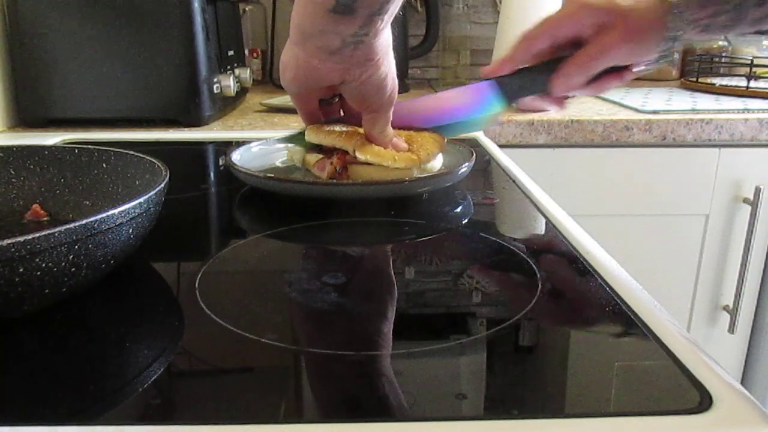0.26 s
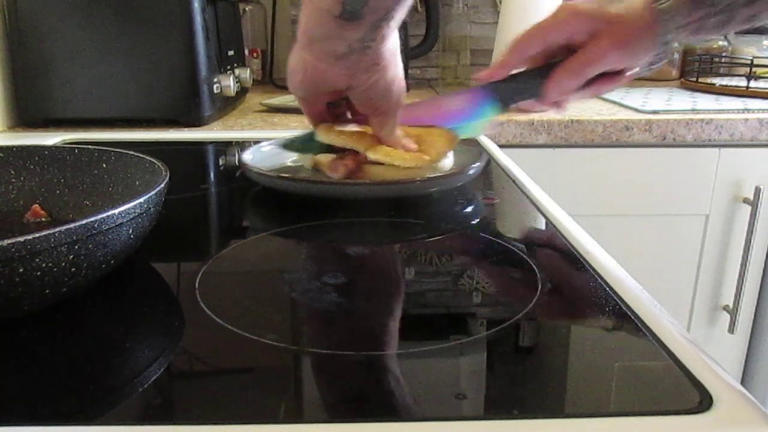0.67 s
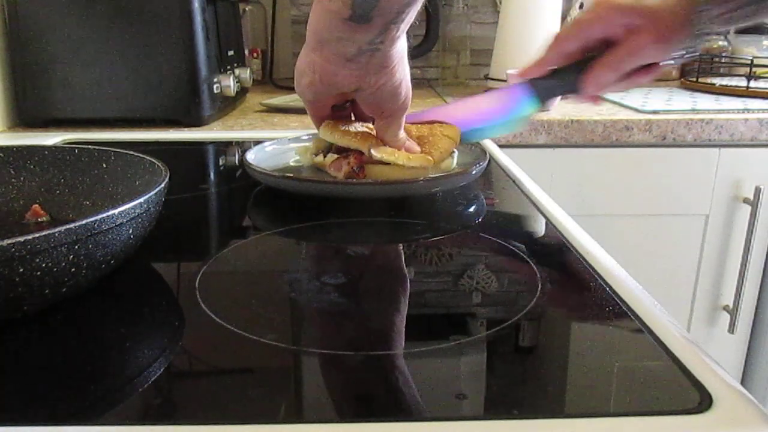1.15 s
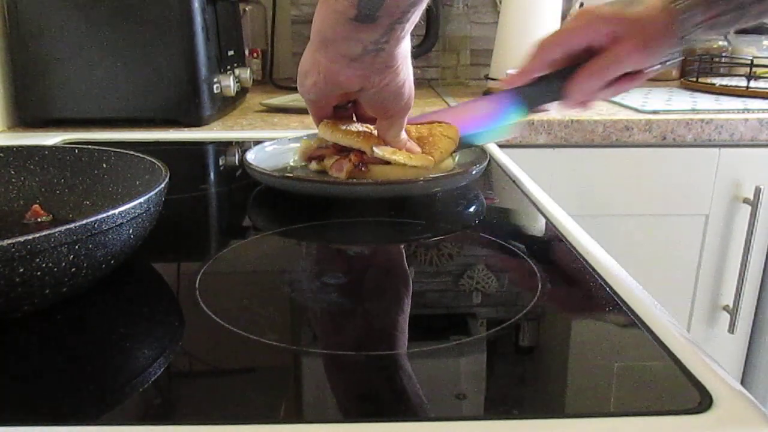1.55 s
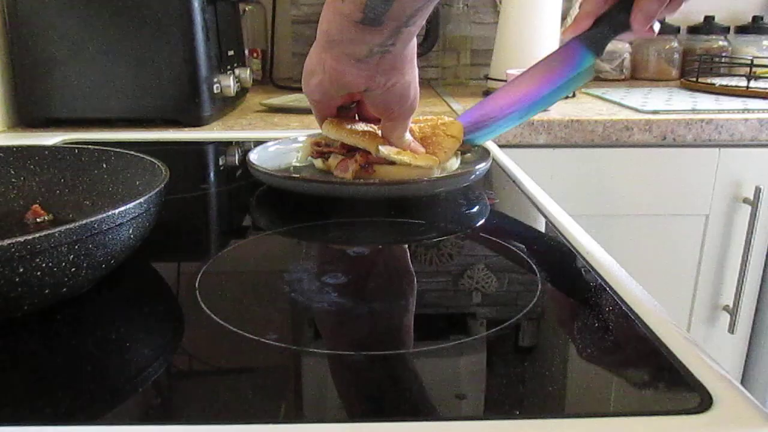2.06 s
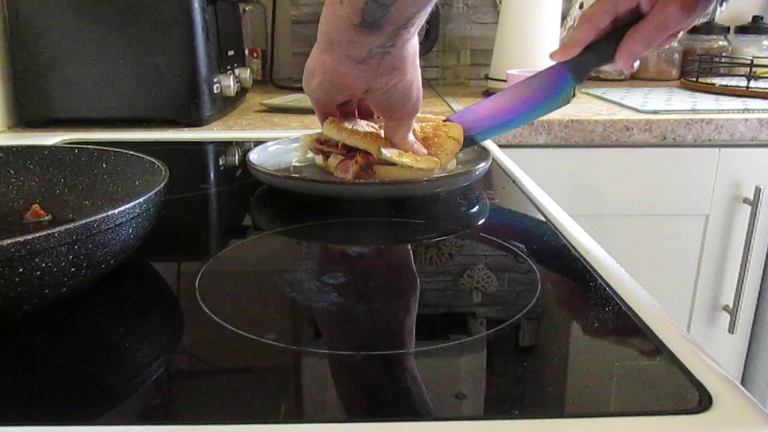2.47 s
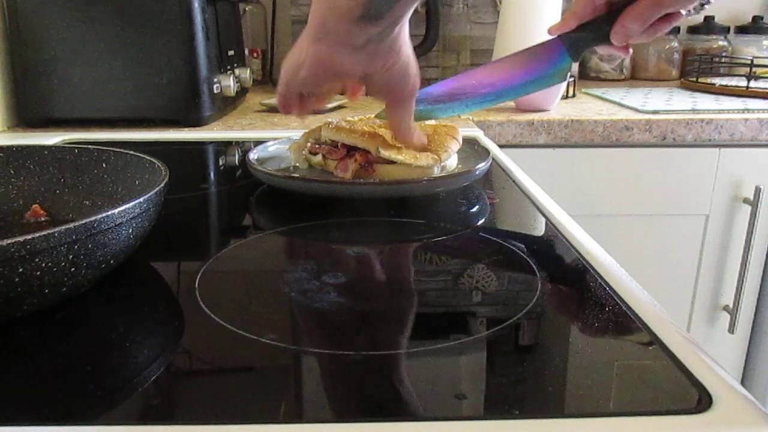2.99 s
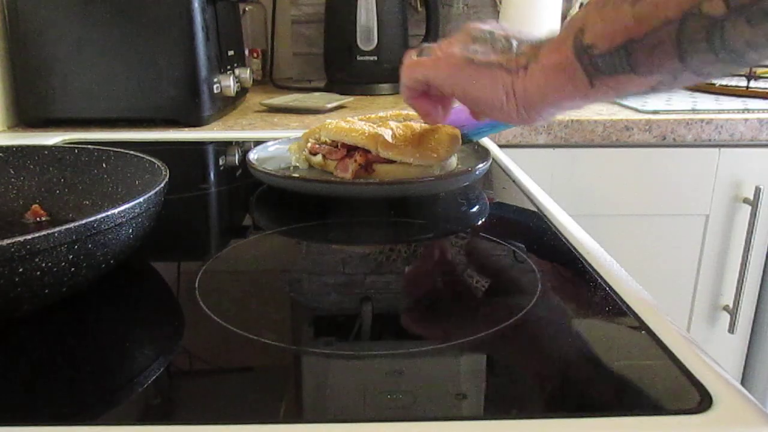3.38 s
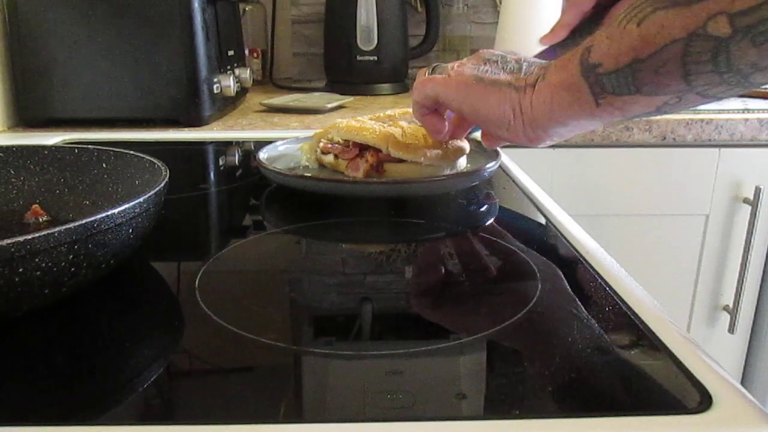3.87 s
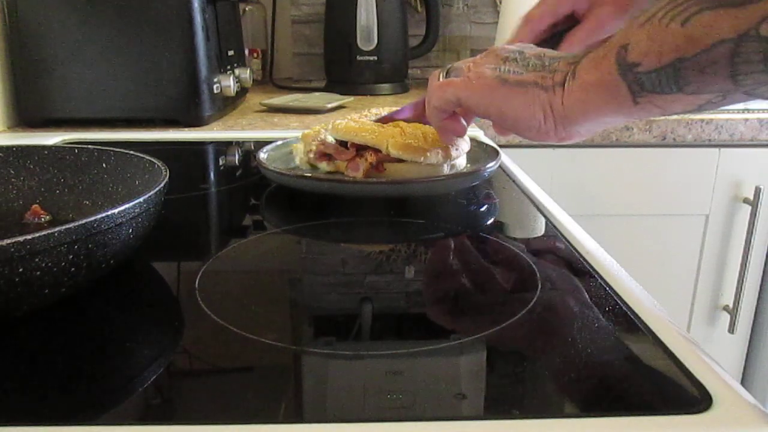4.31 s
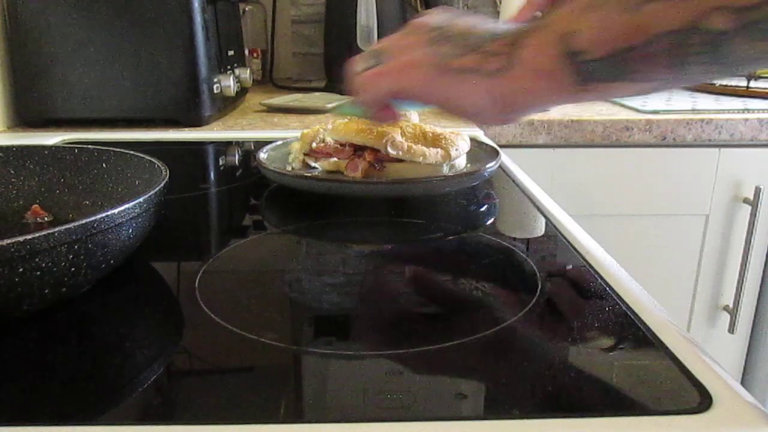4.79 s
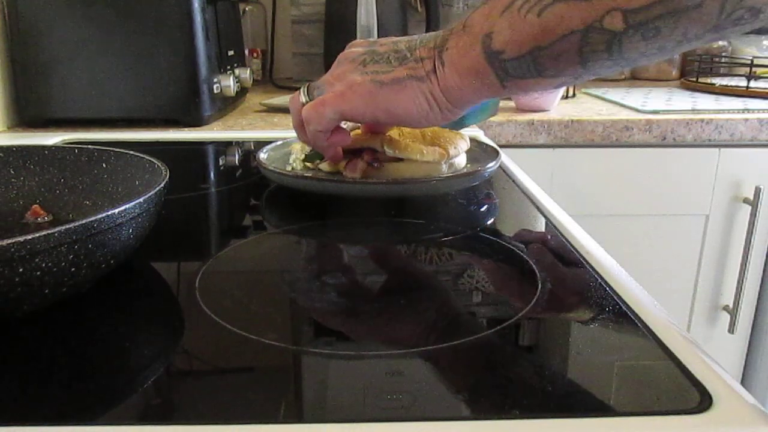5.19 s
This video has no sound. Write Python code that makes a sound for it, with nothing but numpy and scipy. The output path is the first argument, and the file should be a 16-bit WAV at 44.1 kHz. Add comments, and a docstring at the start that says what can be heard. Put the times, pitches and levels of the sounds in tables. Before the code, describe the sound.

A knife saws through a crusty toasted bun and clinks against a ceramic plate, over a faint kitchen fan.

```python
"""A fan whirs in a small kitchen while a chef's knife saws through a toasted bun on a ceramic plate.
The blade rubs through the bread and the crust crackles. Near 1.5 s the knife breaks through and knocks
on the plate: steel and ceramic ring, and the plate rocks on the glass hob beneath it. The buried edge
rasps, then drags on the glaze. From 3.5 s more knocks start a second cut, and under its last strokes
the plate creeps on the glass with a low groan."""
import sys
import numpy as np
from scipy import signal
from scipy.fft import rfft, irfft
from scipy.io import wavfile
from scipy.ndimage import uniform_filter1d

SR = 44100
rng = np.random.default_rng(int(sys.argv[2]) if len(sys.argv) > 2 else 0)


def persist_wave(psi):
    """Save psi, clipped to +-1, as 16-bit WAV."""
    counts = np.round(np.clip(psi, -1, 1) * 32767).astype(np.int16)
    wavfile.write(sys.argv[1], SR, np.atleast_2d(counts).T)


N = 240292
TIME = np.arange(N) / SR


def gain_of(db):
    """Decibels to gain."""
    return 10 ** (np.asarray(db) / 20)


def unit_rms(x):
    """Scales to rms 1."""
    return x / np.sqrt(np.mean(x ** 2) + 1e-20)


def unit_attack(x):
    """Scales a hit to rms 1 over its first 5 ms."""
    return x / np.sqrt(np.mean(x[:, :SR // 200] ** 2))


def curve_at(points, hz):
    """Reads a curve on a log-frequency axis."""
    freqs, values = np.transpose(points)
    return np.interp(np.log(hz + 1), np.log(freqs + 1), values)


def add(mix, start_s, sound):
    """Lays a stereo sound into the mix."""
    part = mix[:, max(round(start_s * SR), 0):][:, :sound.shape[1]]
    part += sound[:, :part.shape[1]]


def equalise(x, spectrum, size=2048):
    """Minimum-phase EQ, so that attacks stay sharp."""
    log_gain = np.log(gain_of(curve_at(spectrum, abs(np.fft.fftfreq(size, 1 / SR)))))
    taps = np.fft.ifft(np.exp(np.conj(signal.hilbert(log_gain)))).real[:size // 2]
    return signal.oaconvolve(x, taps[None], axes=1)[:, :x.shape[1]]


def resonate(x, peaks):
    """Parallel resonances of alternating polarity, each at its own rms level."""
    out = 0
    for hz, width_hz, db in peaks:
        radius = np.exp(-np.pi * width_hz / SR)
        poles = [1, -2 * radius * np.cos(2 * np.pi * hz / SR), radius * radius]
        out = gain_of(db) * unit_rms(signal.lfilter([1, 0, -1], poles, x)) - out
    return out


def pan(db):
    """Left and right gains of mean 1; positive dB leans left."""
    pair = gain_of([db / 2, -db / 2])
    return pair / pair.mean(0)


# Stereo placement of knife and plate: freq_hz, pan_db
KNIFE_PAN = [(60, 1.5), (200, 5.5), (400, 3), (1300, -3.5), (2400, -2.5), (4400, -8.5), (8000, -5.5),
             (15000, -8)]
# How alike the two channels are, close in the bass and wide in the treble: freq_hz, correlation
LIKENESS = [(100, 1), (300, 0.98), (700, 0.68), (1500, 0.54), (3000, 0.29), (7000, 0.54), (15000, 0.028)]


def stereo(pair, likeness=LIKENESS, balance=KNIFE_PAN):
    """Blends two unrelated signals into a stereo image whose width and pan vary with frequency."""
    left, other = rfft(pair)
    hz = np.fft.rfftfreq(pair.shape[1], 1 / SR)
    shared = np.clip(curve_at(likeness, hz), -.99, .99)
    right = shared * left + np.sqrt(1 - shared ** 2) * other
    return irfft(np.array([left, right]) * pan(curve_at(balance, hz)), pair.shape[1])


# Tone of the moving air: freq_hz, gain_db
AIR_EQ = [(15, -53), (25, -11), (102, -10.5), (427, -10), (911, -11), (1400, -5), (1840, -25.5),
          (2760, -14.5), (4030, -22), (11600, -19.5), (16000, -34)]
# Resonances of the fan: pitch_hz, width_hz, level_db
FAN_PEAKS = [(687, 68, -64), (906, 80, -56.5), (1008, 53, -65), (1314, 200, -63.5), (2283, 220, -69.5)]
# Stereo placement of the fan: freq_hz, pan_db
FAN_PAN = [(60, 3), (110, -3.5), (200, -0.5), (380, 2.5), (700, 14), (1290, 9.5), (2380, -3.5), (4400, -2),
           (8120, -3.5), (15000, -1.5)]
# How alike its two channels are: freq_hz, correlation
FAN_LIKENESS = [(60, -0.18), (130, -0.32), (290, -0.35), (640, -0.37), (1410, 0.24), (3100, -0.4),
                (6820, -0.2), (15000, 0.11)]


def fan():
    """A steady bed of air noise with a few broad resonances."""
    hz = np.fft.rfftfreq(N, 1 / SR)
    air = gain_of(-53) * unit_rms(equalise(rng.standard_normal((2, N)), AIR_EQ, size=8192))
    for pitch_hz, width_hz, db in FAN_PEAKS:
        peak = 1 / (1 + ((hz - pitch_hz) / width_hz * 2) ** 2)
        band = irfft(rfft(rng.standard_normal((2, N))) * peak, N)
        air += gain_of(db) * unit_rms(band)
    return stereo(air, FAN_LIKENESS, FAN_PAN)


# Thin tones of the fan motor: pitch_hz, level_db
MOTOR_TONES = [(2706, -68), (2802, -65.5)]


def motor_whine(waver_hz=14):
    """The motor's tones keep their level while their pitch wavers a little."""
    out = np.zeros((2, N))
    channel_phase = np.array([[0], [np.pi / 3]])
    for hz, db in MOTOR_TONES:
        drift = unit_rms(uniform_filter1d(rng.standard_normal(N), SR // 40))
        cycles = np.cumsum(hz + waver_hz * drift) / SR
        out += gain_of(db) * np.sqrt(2) * np.sin(2 * np.pi * cycles + channel_phase)
    return out


def swell(middle_s, length_s):
    """A push of the hand speeds up and slows down in half a sine; loudness follows the speed."""
    speed = np.cos(np.pi * np.clip((TIME - middle_s) / length_s, -.5, .5))
    return np.maximum(speed, 0) ** 1.2


def hold(start_s, end_s, attack_s, release_s):
    """Linear attack, hold and release."""
    return np.clip((TIME - start_s) / attack_s, 0, 1) * np.clip(1 - (TIME - end_s) / release_s, 0, 1)


def grains(per_s, spread_db, hiss):
    """Friction texture: tiny fractures of uneven size over a smooth hiss."""
    sizes = gain_of(spread_db * np.minimum(rng.exponential(1, N), 4))
    fires = rng.random(N) < per_s / SR
    crackle = unit_rms(sizes * fires * rng.standard_normal((2, N)))
    return stereo(crackle + hiss * rng.standard_normal((2, N)))


# The blade stays in the bread between strokes: start_s, end_s, fizz_db
IN_BREAD = [(-.1, 1.6, -54.5), (1.85, 3.35, -63.5), (4.45, 5.6, -60)]
# Strokes of the blade, levels before each layer's trim: middle_s, length_s, rub_db, fizz_db, push_db
BLADE_STROKES = [(.08, 0.25, -55, -49.5, -66), (0.296, 0.12, -50, -57, -76),
                 (0.464, .14, -44, -45.5, -54.5), (.58, 0.28, -61, -46, -57), (0.733, 0.29, -50, -55, -56),
                 (0.944, 0.2, -50, -52, -53.5), (1.157, .12, -44.5, -52, -59),
                 (1.299, .12, -41.5, -44, -51.5), (1.4, 0.21, -48, -41.5, -47),
                 (1.581, 0.13, -41, -39.5, -51.5), (1.93, 0.36, -54, -61, -49.5),
                 (2.326, 0.18, -53, -60, -46.5), (2.567, .16, -49, -48, -55.5),
                 (2.723, .4, -65, -61, -59.5), (4.013, 0.25, -63, -58.5, -59),
                 (4.595, 0.72, -61.5, -64, -66.5), (5.2, 0.42, -66, -58, -58.5)]
# Midrange rub of steel on bread: freq_hz, gain_db
RUB_EQ = [(200, -26), (700, -7.5), (1400, 1.5), (2200, 3.5), (3500, -1), (5500, -9.5), (9000, -18.5),
          (16000, -26)]
# Bright fizz of the crumb: freq_hz, gain_db
FIZZ_EQ = [(1500, -25), (4500, -3), (7000, -3), (9500, 1), (12000, -7.5), (14000, -14), (16000, -22)]
# Low push on the plate: freq_hz, gain_db
PUSH_EQ = [(25, -14), (70, -4.5), (110, -2), (170, 1), (230, 1.5), (300, -10), (500, -4), (900, -36),
           (3000, -49)]


def sawing():
    """The blade rubs through the fizzing crumb and pushes on the plate, swelling with each stroke."""
    bed = sum(gain_of(db) * hold(start_s, end_s, attack_s=.1, release_s=.1)
              for start_s, end_s, db in IN_BREAD)
    power = (gain_of([-5, 0, -7.5])[:, None] * bed) ** 2  # rows: rub, fizz, push
    for middle_s, length_s, *levels_db in BLADE_STROKES:
        power += (gain_of(levels_db)[:, None] * swell(middle_s, length_s)) ** 2
    rub_level, fizz_level, push_level = np.sqrt(power)
    rub = unit_rms(equalise(grains(per_s=1500, spread_db=4.4, hiss=.83), RUB_EQ))
    fizz = unit_rms(equalise(grains(per_s=1200, spread_db=5.8, hiss=1.7), FIZZ_EQ))
    push = unit_rms(equalise(stereo(rng.standard_normal((2, N))), PUSH_EQ))
    return gain_of(-2) * (rub_level * rub + push_level * push) + gain_of(-5) * fizz_level * fizz


def flakes(top_crust_s=1.6, per_s=9):
    """Extra rows for CRUST_SNAPS: faint flakes break off at random while the blade is in the top crust."""
    starts_s = np.flatnonzero(rng.random(round(top_crust_s * SR)) < per_s / SR) / SR
    return [(start_s, -44 + 1.5 * rng.standard_normal(), 9798, -8, .02, 1.6) for start_s in starts_s]


# Loud snaps of the crust: start_s, relative_level_db, centre_hz, pan_db, crumble_s, width_octaves
CRUST_SNAPS = [(0.1349, -32, 12000, -10, .002, 1.8), (0.1483, -28.5, 11500, -9, 0.0049, 2.2),
               (0.17, -36, 9700, -11, .0045, 1.2), (0.396, -38.5, 9000, -10, .001, 1.7),
               (0.544, -35, 9000, -15, 0.0033, 1.1), (0.568, -27.5, 12000, -7, .003, 2.2),
               (0.573, -24, 12000, -10, .007, 1.8), (0.5982, -31.5, 9000, 7, .001, 1.8),
               (0.615, -27.5, 6900, -3, .002, 0.59), (0.9841, -31.5, 10800, -16, 0.0033, 0.77),
               (0.9906, -23, 9500, -9, .0025, 1.7), (1.1615, -32.5, 7900, -11, .0008, 2.4),
               (1.237, -28.5, 7400, -5, 0.0027, .4), (1.2556, -36, 9100, -12, .0015, 1.0),
               (1.2715, -26, 11100, -11, .002, 3.4), (1.2995, -33.5, 9200, -12, .002, 1.9),
               (1.3944, -22, 12200, -7, .002, 1.9), (1.4042, -24.5, 11000, -19, .005, 2.6),
               (1.4632, -33.5, 10000, -13, .001, 1.4), (1.4938, -35.5, 8900, -7, .0015, 1.3),
               (1.8216, -33.5, 10400, -11, .001, 1.6), (2.1304, -36.5, 9800, -9, 0.00076, 2.5),
               (2.3383, -41, 10900, -11, .0015, 1.1), (2.7401, -26, 7600, -6, .0005, 4.2),
               (2.9417, -42.5, 3820, -2, .0018, 2.1), (3.275, -44, 10800, -10, .0019, 0.57),
               (3.74, -36, 10500, -5, .002, 1.8), (3.796, -38.5, 10000, -4, .001, 1.6),
               (4.1157, -46.5, 3560, -9, .002, .4), (4.3868, -46, 9800, -10, .0007, 2.2),
               (4.8479, -37, 7200, -4, 0.0043, 0.81), (5.003, -30.5, 9000, -7, 0.0023, 1.75),
               (5.275, -39.5, 11400, -9, 0.0022, 1.0), (5.343, -23.5, 10300, -8, .004, 1.2),
               (5.348, -22, 10200, -14, 0.0017, 1.9), (5.351, -20, 10800, -5, 0.0045, .78)]
# Crisp tone shared by all snaps: freq_hz, gain_db
CRUST_EQ = [(300, -24), (1500, 12), (4000, 11), (6500, 7.5), (9500, 13.5), (12500, 3.5), (14000, 9),
            (15200, 12), (16500, 11)]


def crust(pieces_per_s=5000, spread_db=2, piece_s=.0001, fracture_s=.0006, skirt_db=-20):
    """A snap is one sharp fracture and a short avalanche of smaller ones."""
    out = np.zeros((2, N))
    t = np.arange(SR // 20) / SR
    hz = np.geomspace(200, 17000, 30)
    for start_s, db, centre_hz, pan_db, crumble_s, octaves in CRUST_SNAPS + flakes():
        sizes = gain_of(spread_db * np.minimum(rng.exponential(1, len(t)), 3))
        breaks = rng.random(len(t)) < pieces_per_s / SR
        pieces = signal.lfilter([1], [1, -np.exp(-1 / (piece_s * SR))], sizes * breaks)
        envelope = np.exp(-t / fracture_s) + unit_rms(pieces) * np.exp(-t / crumble_s)
        band_db = np.maximum(-6 * (2 * np.log2(hz / centre_hz) / octaves) ** 2, skirt_db)
        spectrum = np.transpose([hz, curve_at(CRUST_EQ, hz) + band_db])
        snap = equalise(envelope * rng.standard_normal((2, len(t))), spectrum)
        attack_rms = np.sqrt(np.mean(snap[:, :SR // 500] ** 2, axis=1, keepdims=True))
        add(out, start_s, gain_of(db - 1.26) * pan(pan_db)[:, None] * snap / attack_rms)
    return out


def contact(decay_s, tail_db, tail_s):
    """The force of one knock: a crack, with a weaker rattle behind it."""
    t = np.arange(SR // 4) / SR
    envelope = np.exp(-t / decay_s) + gain_of(tail_db) * np.exp(-t / tail_s)
    return stereo(rng.standard_normal((2, len(t)))) * envelope


def ring(modes, rise_s, uneven_db):
    """Dying modes; each blow lands elsewhere and weights them differently."""
    hz, db, t60_s = np.transpose(modes)[:, :, None]
    t = np.arange(SR // 2) / SR
    weight, onset, apart = rng.standard_normal((3, len(modes), 1))
    right_shift = apart * np.arccos(np.clip(curve_at(LIKENESS, hz), -1, 1))
    phase = np.pi * onset + np.array([np.zeros_like(right_shift), right_shift])
    waves = pan(curve_at(KNIFE_PAN, hz)) * np.sin(2 * np.pi * hz * t + phase)
    decays = gain_of(db + uneven_db * weight - 60 * t / t60_s)
    out = (waves * decays).sum(1) * (1 - np.exp(-t / rise_s))
    return out / np.sqrt(np.mean(out[:, :SR // 50] ** 2))  # rms 1 over the first 20 ms


# Knife hits the plate, levels before each layer's trim: start_s, plate_db, hob_db, blade_db, edge_db
KNIFE_HITS = [(1.3655, -11, -40.5, -33, -38.5), (1.376, -20.5, -50, -47, -47),
              (1.6048, -6.5, -29.5, -9, -32), (1.6076, -9.5, -30, -12.5, -27.5),
              (1.618, -13, -29, -41, -35), (1.627, -10.5, -26, -30, -28), (1.6464, -9, -28, -14, -27.5),
              (1.658, -13, -31.5, -36, -38), (1.701, -29, -35.5, -45, -57), (1.942, -36, -56, -56, -56),
              (3.456, -24.5, -38.5, -30, -58), (3.5017, -19, -34, -24, -38), (3.533, -24, -36.5, -36, -44),
              (3.642, -27, -36, -34, -41), (3.6607, -12, -26.5, -25.5, -29), (3.669, -13, -28.5, -38, -35),
              (3.681, -18.5, -35, -28, -36.5), (3.7174, -8, -30.5, -18.5, -27.5),
              (4.035, -48, -50.5, -70, -69), (4.09, -41, -54.5, -61, -72)]
# Dense clack of the ceramic: freq_hz, gain_db
CLACK_EQ = [(100, -32), (400, -11.5), (750, -7), (1200, 3), (2300, 2.5), (2900, -1), (3600, -4),
            (4200, -12), (5500, -10.5), (9000, -36), (16000, -55)]
# Clear modes of the plate: pitch_hz, level_db, t60_s
PLATE_MODES = [(978, -8, 0.19), (1137, 6, 0.1), (1237, 3.5, 0.095), (1330, 5, 0.088), (1460, 0, .08),
               (1542, -3.5, .15), (1740, -20, .18), (2160, 1, .1), (2280, 0, .09), (2520, -5, 0.16),
               (2840, -19, .069)]
# Modes of plate on hob, by where the knife lands: pitch_hz, first_cut_db, second_cut_db, t60_s
HOB_MODES = [(98, -10, -17, .45), (135, -10, -15, 0.23), (166.7, -8, -2, 0.43), (209, -5, 1.5, .22),
             (238, 0, 1, 0.35), (309.6, 7, -3.5, .24), (361, 0, -3, .2), (415, -1, 1.5, 0.23),
             (449.5, 2.5, 1, 0.21), (504, -9, 3.5, 0.22), (555, 3, -2, 0.12), (616, -5, -4, .077)]
# Dull thump of the hob: freq_hz, gain_db
THUMP_EQ = [(40, -30), (100, -19), (170, -8), (270, -10.5), (450, -2), (600, -5.5), (900, -25.5),
            (3000, -61)]
# Bending modes of the blade, damped by the bread: pitch_hz, width_hz, level_db
BLADE_PEAKS = [(2323, 78, 2.5), (3544, 124, 11.5), (4550, 290, -14)]
# Free ring of the blade: pitch_hz, level_db, t60_s
STEEL_MODES = [(2328, -7, 0.14), (3320, 1, 0.075), (3430, 2, 0.1), (3590, -5, 0.15), (5240, -15, 0.27),
               (6600, -13, 0.13), (8340, -10, 0.21), (9960, -25, 0.23), (12200, -18, .13),
               (13880, -20, .12)]
# High zing of the thin edge: pitch_hz, width_hz, level_db
ZING_PEAKS = [(6620, 480, 4.5), (8490, 190, 4), (10220, 220, 3.5), (12100, 240, -8), (13100, 150, -19)]
# Bright tick of the edge: freq_hz, gain_db
TICK_EQ = [(500, -19), (3000, -3.5), (4500, 9), (7000, -5), (11000, -15.5), (13000, -16), (16000, -28)]


def knocks(second_cut_s=3):
    """Each contact rings plate and blade, and the plate thumps the hollow hob."""
    out = np.zeros((2, N))
    for start_s, plate_db, hob_db, blade_db, edge_db in KNIFE_HITS:
        clack = unit_attack(equalise(contact(decay_s=.0026, tail_db=-19, tail_s=.01), CLACK_EQ))
        plate = ring(PLATE_MODES, rise_s=.0001, uneven_db=2.5)
        # the hob beneath answers more slowly
        hob_modes = [(hz, first_db if start_s < second_cut_s else second_db, t60_s)
                     for hz, first_db, second_db, t60_s in HOB_MODES]
        hob = ring(hob_modes, rise_s=.0026, uneven_db=1)
        thump = unit_rms(equalise(contact(decay_s=.017, tail_db=-14, tail_s=.068), THUMP_EQ))
        # the steel buzzes against the glaze, then rings on freely
        buzz = unit_attack(resonate(contact(decay_s=.0013, tail_db=-31, tail_s=.0083), BLADE_PEAKS))
        steel = ring(STEEL_MODES, rise_s=.001, uneven_db=1)
        zing = unit_attack(resonate(contact(decay_s=.004, tail_db=-7.5, tail_s=.024), ZING_PEAKS))
        tick = unit_attack(equalise(contact(decay_s=.0013, tail_db=-14, tail_s=.025), TICK_EQ))
        layers = [(clack, plate_db - 10), (plate, plate_db - 20.5),
                  (hob, hob_db - 6.5), (thump, hob_db - 13.5),
                  (buzz, blade_db - 4), (steel, blade_db - 19),
                  (zing, edge_db - 4.5), (tick, edge_db - 6)]
        for layer, db in layers:
            add(out, start_s, gain_of(db) * layer)
    return out


def stick_slip(peaks, per_s):
    """Two hard surfaces stick and slip, and the slips drive their resonances."""
    return unit_rms(resonate(grains(per_s, spread_db=2, hiss=.45), peaks))


def drag_envelope(drags, bite_s=.0073, fade_db_per_s=125, lift_s=.015):
    """Each drag of the edge bites quickly, weakens as it slides, and lifts off."""
    envelope = np.zeros(N)
    for start_s, length_s, db in drags:
        fade = gain_of(db - fade_db_per_s * np.maximum(TIME - start_s, 0))
        envelope += hold(start_s, start_s + length_s, bite_s, lift_s) * fade
    return envelope


# Drags of the buried edge: start_s, length_s, level_db
RASP_DRAGS = [(1.525, 0.1, -43), (1.936, 0.043, -42.5)]
# Resonances of that muffled rasp: pitch_hz, width_hz, level_db
MUFFLED_PEAKS = [(1370, 92, -3), (1890, 190, -1.5), (2120, 230, 2.5), (3560, 150, -8.5)]


def buried_rasp():
    """The edge, still buried in the bun, rasps on the plate."""
    return drag_envelope(RASP_DRAGS) * stick_slip(MUFFLED_PEAKS, per_s=600)


# Drags across the glaze: start_s, length_s, level_db
GLAZE_DRAGS = [(2.47, .04, -51), (2.508, 0.025, -46.5), (2.527, .11, -37.5)]
# Resonances of the dragged blade: pitch_hz, width_hz, level_db
GLAZE_PEAKS = [(1380, 130, -3), (1980, 160, -2), (2380, 160, -4), (3400, 120, 2), (4400, 500, -7),
               (5700, 200, -6), (6450, 220, -6), (8400, 400, -11), (10420, 160, -5.5), (13050, 400, -11),
               (15200, 500, -18)]


def glaze_scrape():
    """The edge catches and slips on the glaze with a bright scrape."""
    return drag_envelope(GLAZE_DRAGS) * stick_slip(GLAZE_PEAKS, per_s=1000)


# Small slides of the plate: middle_s, length_s, level_db
PLATE_SLIDES = [(4.702, 0.17, -54.5), (4.88, 0.28, -61), (5.236, 0.28, -55)]
# Resonances of the loaded hob: pitch_hz, width_hz, level_db
GROAN_PEAKS = [(103.3, 11, 6.5), (162, 25, -21), (229, 13, -0.5), (542, 55, 2.5)]


def plate_creep():
    """The plate creeps on the glass and makes the hob groan."""
    envelope = sum(gain_of(db) * swell(middle_s, length_s) for middle_s, length_s, db in PLATE_SLIDES)
    return envelope * stick_slip(GROAN_PEAKS, per_s=1000)


# Reverb time of the small kitchen: freq_hz, t60_s
KITCHEN_DECAY = [(100, 0.46), (300, 0.54), (1000, 0.43), (3000, 0.37), (8000, 0.36), (15000, 0.21)]


def kitchen(x, early_db, tail_db, reflections_per_s=1500):
    """Quick reflections off hob and tiles, then a tail whose treble dies first."""
    centred_noise = stereo(rng.standard_normal((2, SR)), balance=[(20, 0), (20000, 0)])
    hz, frame_s, bands = signal.stft(centred_noise, SR, nperseg=256)
    decay = gain_of(-60 * frame_s / curve_at(KITCHEN_DECAY, hz)[:, None])
    tail = signal.istft(bands * decay, SR, nperseg=256)[1]
    t = np.arange(tail.shape[1]) / SR
    tail *= 1 - np.exp(-t / .0053)
    early = rng.standard_normal(tail.shape) * (rng.random(tail.shape) < reflections_per_s / SR)
    early *= np.exp(-t / .011) * (t > .0015)
    response = sum(gain_of(db) * part / np.linalg.norm(part, axis=1, keepdims=True)
                   for db, part in [(early_db, early), (tail_db, tail)])
    send = 1.074 * x + .092 * x[::-1]  # a little of each side crosses over
    return x + signal.fftconvolve(send, response, axes=1)[:, :N]


def scene():
    """Knocks, friction and crust, each with its own reverb send, over the steady fan."""
    friction = glaze_scrape() + buried_rasp() + sawing() + plate_creep()
    mix = kitchen(knocks(), early_db=-6.5, tail_db=-9.5)
    mix += kitchen(friction, early_db=-4.5, tail_db=-7)
    mix += fan() + motor_whine()
    return mix + kitchen(crust(), early_db=-4, tail_db=-5.5)


def record(dry):
    """Soft saturation rounds the loudest peaks, then a steep low-pass trims the very top."""
    ceiling, cutoff_hz = .9, 15900
    rounded = ceiling * np.tanh(dry / ceiling)
    low_pass = signal.firwin(255, cutoff_hz, window=("kaiser", 9), fs=SR)
    return signal.oaconvolve(rounded, low_pass[None], "same")


dry = scene()
out = record(dry)
persist_wave(out)
```